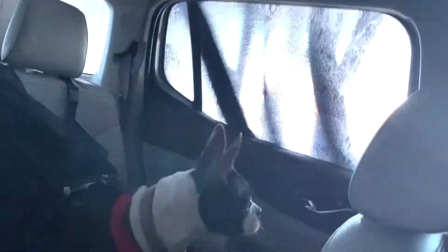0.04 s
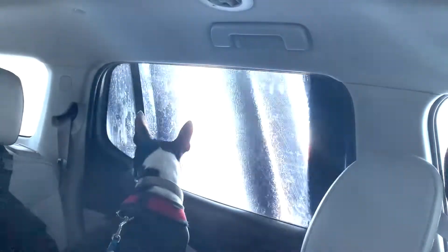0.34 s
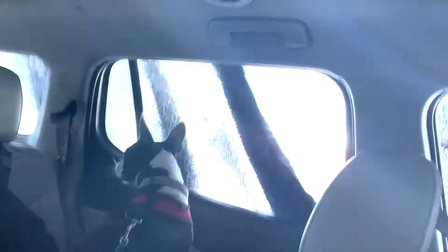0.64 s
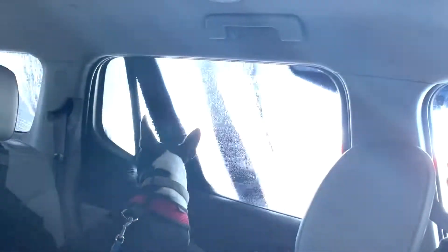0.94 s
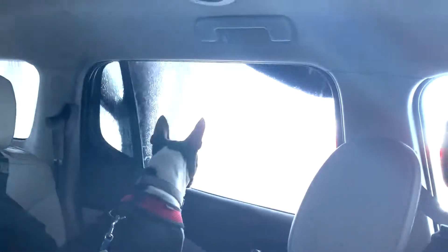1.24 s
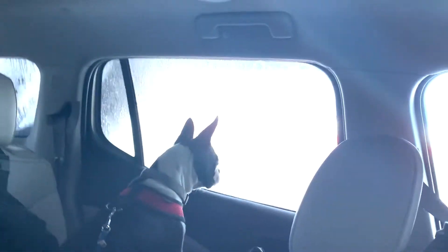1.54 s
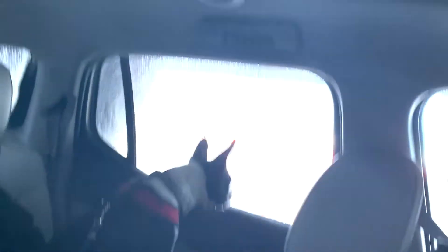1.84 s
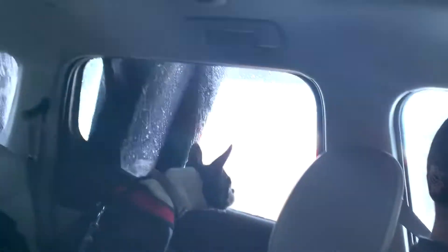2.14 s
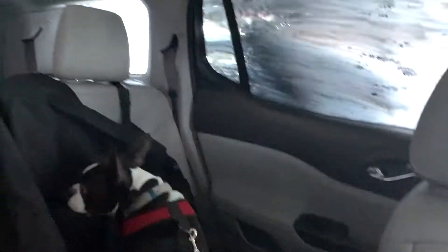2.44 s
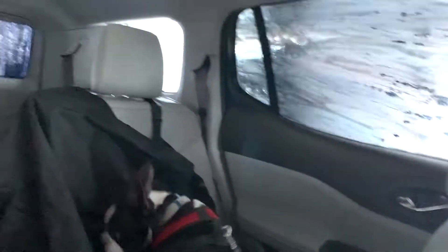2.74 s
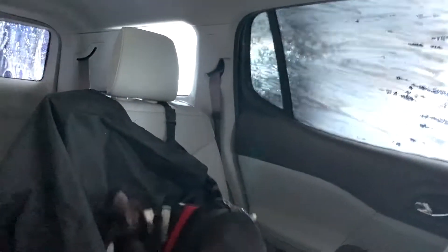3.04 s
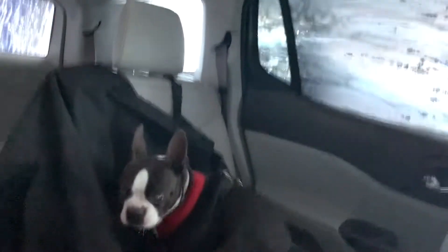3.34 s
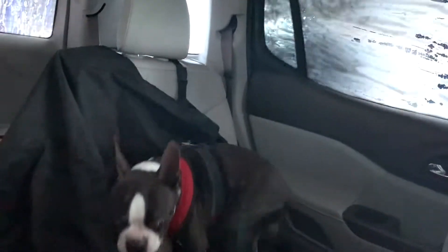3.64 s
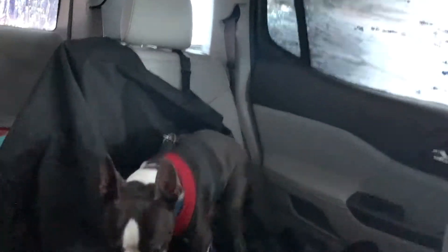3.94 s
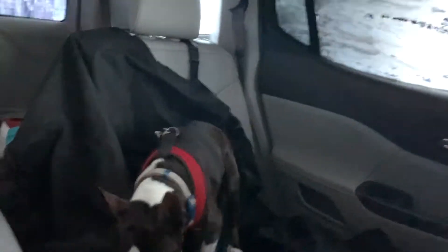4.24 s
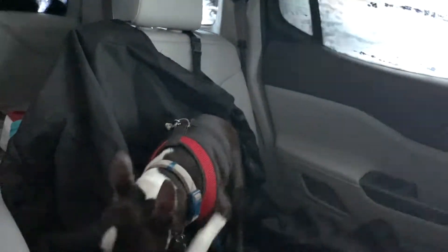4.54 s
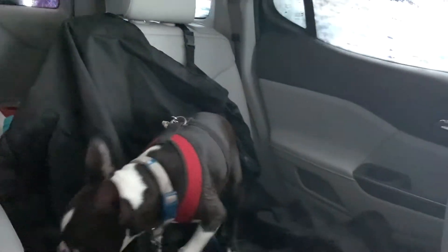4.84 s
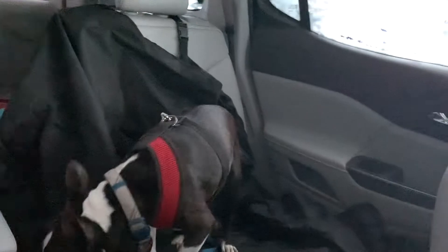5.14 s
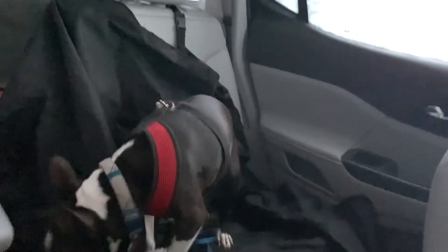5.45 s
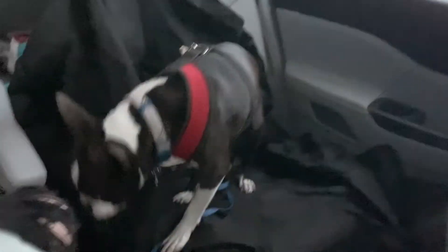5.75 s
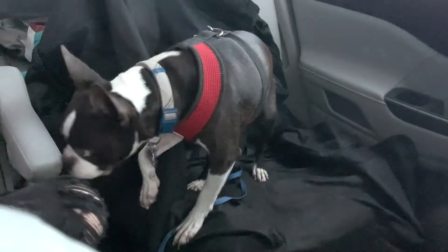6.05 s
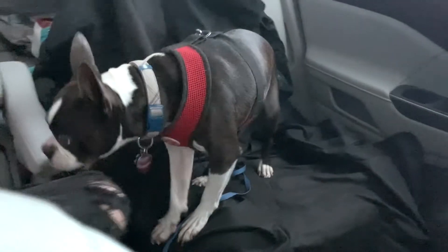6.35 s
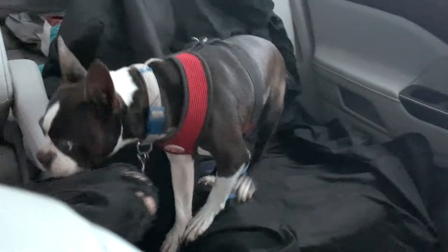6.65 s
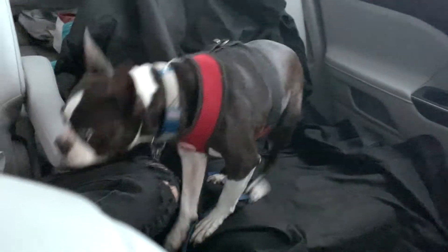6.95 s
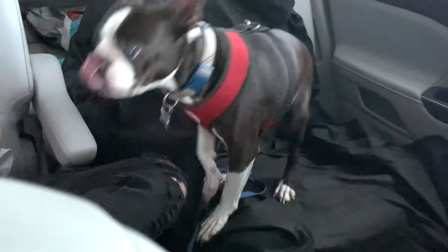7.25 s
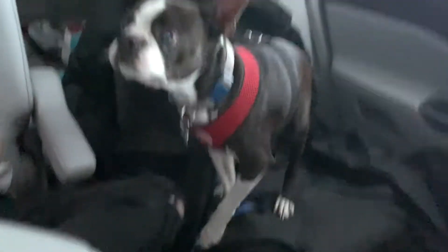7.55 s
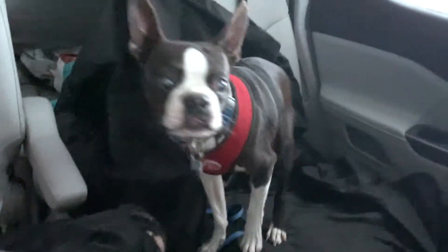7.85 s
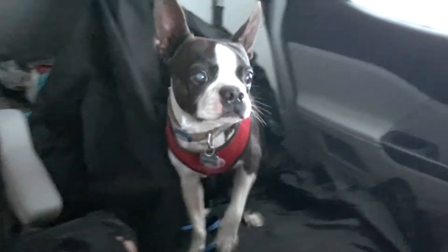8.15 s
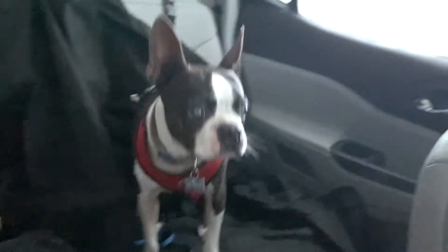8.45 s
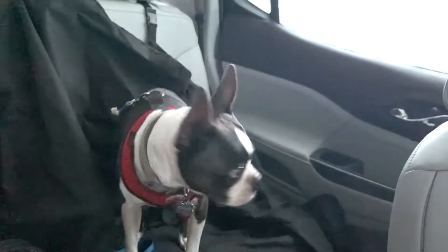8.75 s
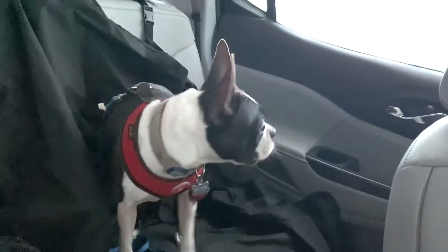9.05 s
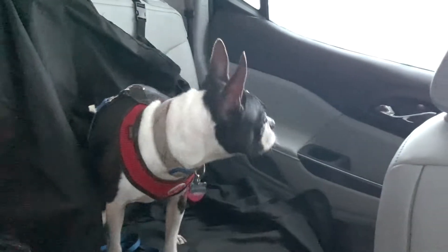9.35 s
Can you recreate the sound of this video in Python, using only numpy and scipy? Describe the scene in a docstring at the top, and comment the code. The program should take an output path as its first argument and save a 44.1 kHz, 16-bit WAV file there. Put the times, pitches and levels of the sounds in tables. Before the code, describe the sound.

Heard from inside a car in an automatic wash, spinning brushes slap the body in a fast rhythm, booming and drumming on the wet panels over a deep rumble. Spray hisses on the glass for the first two seconds, then drops back. From about three seconds a dog's collar tags clink now and then, with faint rustling on the seat cover. Hollow raps join near the end.

```python
"""Car wash with a dog aboard

Heard from inside the car, turning brushes slap the body with cloth strips twice a turn and drag them
over it in between. Each slap booms in the cabin, drums the wet panels and splashes; spray patters on
the glass. On the back seat a dog shifts on the seat cover and its metal collar tags clink."""
import sys
import numpy as np
from scipy import signal
from scipy.fft import rfft, irfft
from scipy.io import wavfile
from scipy.ndimage import uniform_filter1d

SR = 44100
rng = np.random.default_rng(int(sys.argv[2]) if len(sys.argv) > 2 else 0)


def dump_mix(stems):
    """Bounce the given channels to the path in sys.argv[1] as a 16-bit WAV at rate SR."""
    frames = np.atleast_2d(stems).T  # one column per channel
    limited = np.clip(frames, -1, 1)  # hard clip at full scale
    pcm = np.round(limited * 32767).astype(np.int16)
    wavfile.write(sys.argv[1], SR, pcm)


N = 414981
T = np.arange(N) / SR
EAR_LAG_S = 10 / SR

# Table levels are relative: each layer has its own gain on top.
# Stereo width of sound through the body. Each row: frequency in Hz, side against mid in dB.
BODY_WIDTH = [(40, -21), (80, -14), (130, -13.5), (260, -13), (500, -5.5), (800, -1), (1400, 1),
              (3000, 1.5)]
# Spray on the glass. Each row: time in seconds, level in dB.
SPRAY_LEVELS = [(0, -38.5), (.37, -37.5), (.6, -41), (.88, -40), (1.1, -36.5), (1.9, -36.5), (2.05, -40),
                (2.31, -43.5), (2.35, -50.5), (4.35, -47.5), (4.55, -53), (5.2, -50.5), (5.95, -53.5),
                (6.6, -51), (9.41, -50)]
# Wipes of wet cloth, and the dog's moves. Each row: centre and length in seconds, level in dB.
CLOTH_WIPES = [(.05, 0.056, -38.5), (1.966, 0.024, -36.5), (2.268, .016, -35), (4.083, 0.028, -39),
               (4.295, 0.044, -39), (8.857, 0.018, -37), (9.06, 0.03, -36), (9.11, .08, -37.5),
               (9.157, 0.028, -37)]
DOG_MOVES = [(3.3, 0.22, -53), (4.17, 0.11, -50), (5.33, 0.18, -53), (6.27, 0.11, -48.5),
             (6.45, 0.13, -47.5), (7.07, 0.11, -53), (7.33, 0.14, -52.5), (8.3, 0.6, -55.5),
             (9.1, 0.19, -49)]
# Tone of the noisy layers. Each row: frequency in Hz, level in dB.
SPRAY_TONE = [(1200, -16), (2500, -8), (4000, -4), (6000, 2.5), (8500, 1.5), (11000, 4.5), (14000, -3),
              (16000, 0)]
WIPE_TONE = [(600, -23), (1500, 15), (2000, 13.5), (2400, 17.5), (2750, 13), (3200, 11), (4200, 6.5),
             (6500, -1.5), (10000, -12), (16000, -32)]
THROB_TONE = [(18, -27.5), (33, -10), (43, 4), (55, -3.5), (68, -21)]
RUMBLE_TONE = [(15, -49), (28, -11), (44, -11), (58, -2), (78, 5), (98, -3), (120, -0.5), (145, -9.5),
               (220, -36)]
PANEL_TONE = [(90, -28.5), (135, -2), (185, 2), (240, -2.5), (300, -5.5), (350, -3.5), (440, -9.5),
              (550, -11.5), (660, -23.5), (900, -35), (1600, -54)]
SPLASH_TONE = [(400, -7), (680, 5), (920, -1.5), (1200, -3.5), (1420, -8.5), (1650, -8.5), (1900, -12),
               (2200, -11.5), (3000, -18), (3800, -18.5), (5500, -29.5), (9000, -58)]
# Collar tags meet. Each row: start in seconds, then contact tick, main mode and upper modes in dB.
TAG_CLINKS = [(3.053, -38, -37, -52), (3.21, -29, -29, -42), (3.414, -35, -22, -44), (3.51, -37, -39, -48),
              (3.628, -37, -26, -45), (3.715, -42, -31, -43), (3.835, -36, -48, -44),
              (3.976, -37, -35, -46), (4.149, -28, -22, -38), (4.188, -28, -38, -47),
              (4.237, -32, -27, -43), (4.354, -34, -33, -48), (4.393, -40, -34, -49),
              (4.728, -40, -39, -53), (5.528, -35, -28, -44), (5.669, -36, -30, -41),
              (6.054, -30, -17, -31), (6.275, -36, -29, -41), (6.291, -28, -26, -45),
              (6.548, -41, -42, -44), (7.537, -43, -36, -55), (7.658, -43, -35, -54),
              (8.075, -42, -33, -50), (8.264, -42, -37, -47), (8.404, -32, -24, -45),
              (8.442, -42, -31, -49), (9.075, -39, -30, -51), (9.209, -41, -32, -53)]
# Modes of a tag (main one first), the collar's metal ring and a small stiff part like plastic trim.
# Each row: frequency in Hz, level in dB, nominal time to fade by 60 dB in seconds.
TAG_MODES = [(8628, 1, .16), (13019, 0, .18), (13890, -8, .08), (14423, -12, .08), (15540, -12, .06)]
COLLAR_MODES = [(5566, -6.5, .26), (5990, 2, .03)]
TRIM_MODES = [(1626, -3, .035), (1965, 0, .05), (2266, -4, .065), (3397, -4, .04)]
# Deepest throb of the body. Each row: time in seconds, level in dB.
THROB_LEVELS = [(0, -16.5), (.35, -17), (.55, -18), (.8, -24), (1, -20), (1.5, -23), (2.15, -17),
                (2.28, -22), (2.36, -28), (5.6, -34), (6.4, -16), (7.7, -28.5), (8.2, -24), (9.41, -24)]
# Cloth dragging between slaps. Each row: time in seconds, then rumble, drumming and splash in dB.
DRAG_LEVELS = [(0, -21, -21.5, -31), (0.7, -19.5, -22.5, -34), (2.1, -19, -21.5, -31.5),
               (2.4, -17.5, -19.5, -30.5), (2.9, -22, -20.5, -30), (3.4, -16.5, -20.5, -29.5),
               (4.1, -18.5, -19.5, -29), (4.55, -19, -19, -31.5), (5, -18, -18.5, -30),
               (5.95, -19.5, -17, -31), (6.5, -21, -18.5, -32), (7.2, -18.5, -20, -31.5),
               (7.75, -19, -19, -32), (8.2, -20.5, -18, -28.5), (8.5, -19, -15.5, -28),
               (9.41, -19.5, -16.5, -29)]
# Panels ringing under a brush. Each row: start and end in seconds, pitch and filter width in Hz,
# level in dB.
PANEL_RINGS = [(0.065, 2.25, 259, 104, -28.5), (2.35, 4.26, 373, 105, -27.5), (4.84, 6.73, 189, 21, -29),
               (4.8, 7.3, 541, 99, -34.5), (4.52, 6.1, 860, 450, -39.5), (5.41, 6.08, 352, 180, -25),
               (5.97, 6.58, 182, 14, -25), (6.3, 7.87, 78, 15, -17), (8, 8.85, 695, 130, -37),
               (8.8, 9.6, 830, 190, -38)]
# Soaked strips smack flat on doors and glass; the last brush raps on a stiff, hollow panel.
# Each row: time in seconds, pitch of the spot in Hz, level in dB.
WET_SMACKS = [(1.815, 740, -32), (1.979, 690, -31), (2.33, 716, -22.5), (2.385, 1010, -29.5),
              (2.521, 700, -27), (2.586, 537, -23.5), (2.69, 555, -30), (3.217, 525, -21), (3.33, 750, -28),
              (3.572, 814, -26.5), (4.083, 540, -21), (4.279, 540, -21.5), (4.382, 563, -25),
              (4.794, 550, -23), (4.884, 806, -25.5), (5.19, 596, -27), (5.694, 604, -25),
              (5.809, 540, -25), (5.961, 596, -23), (6.14, 557, -25), (6.761, 516, -22.5),
              (7.998, 560, -20), (8.152, 507, -18.5), (8.383, 558, -18), (8.496, 564, -21),
              (8.56, 505, -17)]
HOLLOW_RAPS = [(8.208, 850, -27), (8.324, 935, -30.5), (8.424, 860, -29.5), (8.51, 850, -27),
               (8.597, 896, -29), (8.657, 860, -27.5), (8.735, 925, -28.5), (8.815, 880, -26.5),
               (8.95, 900, -24.5), (9.185, 904, -26), (9.254, 925, -27), (9.299, 900, -26),
               (9.374, 890, -27.5)]
# Tone of a smack and of a rap. Each row: multiple of the pitch, level in dB.
SMACK_TONE = [(.3, -12.5), (.75, -8), (1, 7.5), (1.25, -8.5), (1.6, -7), (2, -21.5), (2.4, -18.5),
              (5, -35.5)]
RAP_TONE = [(.6, -34), (.85, -16), (.95, -1), (1.07, 0), (1.16, -19), (1.36, -16), (1.6, -30)]
# Hard blows that each sound one panel. Each row: time in seconds, pitch in Hz, level in dB.
PANEL_KNOCKS = [(2.335, 190, -8.5), (2.597, 413, -19), (2.773, 347, -9.5), (2.97, 354, -8.5),
                (3.376, 185, -13), (4.294, 408, -15), (4.38, 187, -10), (4.877, 444, -16),
                (5.172, 178, -13), (5.232, 188, -12), (5.329, 198, -13), (5.531, 348, -15),
                (5.928, 218, -11), (5.958, 366, -12), (6.029, 193, -13), (6.141, 190, -9), (6.28, 210, -11),
                (6.418, 194, -12), (6.957, 186, -12), (7.129, 182, -10), (7.239, 188, -6),
                (7.315, 175, -11), (7.497, 130, -11), (8.56, 470, -12), (9.185, 355, -13)]
# Brushes take over in turn. Each row: first slap in seconds, turns per second, boom pitch in Hz.
BRUSH_PASSES = [(0.104, 3.9, 60.3), (2.381, 5, 90), (4.601, 4.93, 80), (6.39, 6.1, 84), (8.01, 5.03, 85.4)]
# The heavy slaps. Each row: time in seconds, boom pitch in Hz, then boom and drumming in dB.
ACCENT_SLAPS = [(0.427, 75.5, -6.5, -21.5), (.52, 69, -15, -25), (.615, 56.6, -10, -22),
                (.666, 61, -12, -32), (0.799, 57.4, -9, -27), (0.851, 70.5, -7.5, -41),
                (1.066, 77.5, -9, -30), (1.189, 72, -9, -36), (1.432, 78, -5, -28), (1.529, 43.2, -7, -28),
                (1.622, 71, -5.5, -19), (1.675, 64.4, -6, -26), (1.846, 77, -12, -19),
                (1.972, 68.5, -8, -25), (2.148, 62, -3.5, -36), (2.257, 71, -10, -39),
                (2.377, 91, -12, -16), (2.523, 84, -4.5, -23), (2.698, 93, -4.5, -17),
                (2.78, 86, -4.5, -22), (2.946, 83.4, -7, -13.5), (3.879, 94, -6.5, -21),
                (4.087, 82, -6, -31), (4.285, 103.6, -3, -14), (5.392, 87, -6.5, -34),
                (5.817, 90, -7, -19.5), (6.023, 85, -6, -18.5), (6.138, 79, -11, -14.5),
                (6.22, 84, -4.5, -28), (6.406, 89, -1, -19), (6.547, 101, -5, -20), (6.595, 90, -7, -26),
                (6.684, 84, -3, -26), (6.821, 98, -9, -20.5), (6.891, 92.5, -4.5, -22),
                (6.966, 88, -7, -25), (7.012, 79.5, -7.5, -22), (7.108, 75, -5.5, -19),
                (7.168, 83.5, -3.5, -21), (7.245, 84, -5, -20), (7.295, 103, -6, -23),
                (7.377, 81, -4.5, -25), (7.5, 101.7, -2.5, -29), (7.683, 47.6, -10, -16.5),
                (7.748, 93, -13, -18.5), (8.56, 83, -6, -12.5), (8.66, 97, -9, -18)]


def undb(db):
    """Decibels to gain."""
    return 10 ** (np.asarray(db) / 20)


def curves(table):
    """Each level column of a timed table as a fader ride."""
    times, *columns = np.transpose(table)
    return [np.interp(T, times, column) for column in columns]


def impulse(points, size=8192):
    """Minimum-phase impulse response through (Hz, dB) points, rolling off above the last."""
    hz, db = np.transpose(points)
    grid = np.maximum(np.arange(size // 2 + 1) * SR / size, 1)
    gain = undb(np.interp(np.log(grid), np.log(hz), db)) * np.minimum(hz[-1] / grid, 1) ** 2
    cepstrum = irfft(np.log(gain))
    cepstrum[1:size // 2] *= 2
    cepstrum[size // 2 + 1:] = 0
    return irfft(np.exp(rfft(cepstrum)))


def colour(x, tone):
    """Give a white excitation a tone, keeping its power."""
    ring = impulse(tone)
    return signal.oaconvolve(x, ring[None] / np.linalg.norm(ring), axes=1)[:, :N]


def flutter(rate):
    """Glide to a new random value rate times a second."""
    hold = int(SR / rate)
    return uniform_filter1d(rng.standard_normal(N)[np.arange(N) // hold], hold)


def impacts(rate, spread_db=0):
    """Two unrelated streams of tiny random impacts, rms 1; spread_db makes them more uneven."""
    sizes = undb(spread_db * rng.standard_normal((2, N)))
    hits = (rng.random((2, N)) < rate / SR) * rng.standard_normal((2, N)) * sizes
    return hits / hits.std()


def add(track, start_s, sound):
    """Mix a sound into a track at a time."""
    start = int(start_s * SR)
    first, last = max(start, 0), min(start + len(sound), N)
    if last > first:
        track[first:last] += sound[first - start:last - start]


def strokes(rows, gain_db):
    """Envelope of strokes that swell and fade."""
    return sum(undb(db + gain_db) * np.exp(-2 * ((T - s) / length) ** 2) for s, length, db in rows)


def landing(t, rise, fall):
    """Envelope of a strip that lays itself on the body, peaks at t = 0 and slides off."""
    return np.where(t < 0, np.exp(-(t / rise) ** 2), np.exp(1 - np.hypot(1, t / fall)))


def surround(pair, left_db):
    """Mid and side to stereo: bass fills the cabin alike, higher sounds come from all round."""
    side = signal.oaconvolve(pair[1], impulse(BODY_WIDTH))[:N]
    return np.array([pair[0] + side, pair[0] - side]) * undb([[left_db / 2], [-left_db / 2]])


def from_right(x):
    """A sound from the right: the left side hears it a little later, with its sign flipped."""
    return np.array([-np.interp(T - EAR_LAG_S, T, x), x])


def cabin(pair, echo_db, t60):
    """Glass and trim return a sound within milliseconds, differently to each side."""
    t = np.arange(SR // 12) / SR
    echoes = rng.standard_normal((2, len(t))) * 1000 ** (-t / t60) * (t > .002)
    echoes *= undb(echo_db) / np.linalg.norm(echoes, axis=1, keepdims=True)
    return (pair + signal.oaconvolve(pair, echoes, axes=1)[:, :N]) / np.hypot(1, undb(echo_db))


def spray(gain_db, diffuse_db):
    """Fine drops patter on the side window; the lower hiss scatters round the cabin."""
    strength = undb(curves(SPRAY_LEVELS)[0] + gain_db + flutter(27))
    direct = from_right(colour(impacts(22000) * strength, SPRAY_TONE)[0])
    diffuse_tone = [(1000, -1.5), (2300, 1), (4000, -1.5), (6000, -5.5), (8000, -24.5)]
    diffuse = colour(impacts(12000, spread_db=.5) * strength, diffuse_tone)
    return direct + undb(diffuse_db) * diffuse


def swishes(gain_db):
    """Short, bright wipes of cloth that grips and slips on the glass."""
    grip = undb(3 * flutter(120))
    return colour(impacts(2500, spread_db=2.5) * grip * strokes(CLOTH_WIPES, gain_db), WIPE_TONE)


def rustle(gain_db, diffuse_db):
    """Fur and harness catch on the weave of the seat cover; the cabin scatters the lower hiss."""
    strength = strokes(DOG_MOVES, gain_db) * undb(2.2 * flutter(45))
    catches = impacts(16000, spread_db=2.2) * strength
    direct = from_right(colour(catches, [(2500, -5), (6000, -36), (9000, 24), (16000, 5)])[0])
    diffuse_tone = [(2500, -8), (5500, .5), (7000, 6.5), (9000, -30)]
    diffuse = colour(rng.standard_normal((2, N)) * strength, diffuse_tone)
    return direct + undb(diffuse_db) * diffuse


def collar_tags(tick_gain_db, tick_decay_s, rebound_db):
    """Tags tick together, rebound once and ring, in a new mix for each point of contact."""
    contacts, left, right = np.zeros((3, N))
    t = np.arange(SR // 3) / SR
    hz, mode_db, t60 = np.transpose(TAG_MODES)[:, :, None]
    for s, tick_db, main_db, upper_db in TAG_CLINKS:
        detune, damping, swing = rng.standard_normal((3, len(TAG_MODES), 1))
        pitch = hz * (1 + .0008 * detune)
        ring_s = t60 * np.exp(.2 * damping)  # fur damps each ring differently
        lag_s = 229e-6 + 2e-6 * swing  # swinging shifts the lag between the ears
        fade = undb(np.where(hz == hz[0], main_db, upper_db) + mode_db) * 1000 ** (-t / ring_s)
        add(right, s, (fade * np.sin(2 * np.pi * pitch * t)).sum(0))
        add(left, s + EAR_LAG_S, -(fade * np.sin(2 * np.pi * pitch * (t + EAR_LAG_S - lag_s))).sum(0))
        for delay_s, db in [(0, 0), (rng.uniform(.002, .009), rebound_db)]:
            tick = np.exp(-t / tick_decay_s) * rng.standard_normal(len(t))
            add(contacts, s + delay_s, undb(tick_db + tick_gain_db + db) * tick)
    tick_tone = [(2000, -22), (6000, -20), (8700, 7), (11000, 7.5), (14200, 13), (16000, -2)]
    return np.array([left, right]) + from_right(colour(contacts[None], tick_tone)[0])


def struck(modes, start_s, level_db):
    """One blow on a small object: its modes ring and fade."""
    out, t = np.zeros(N), np.arange(SR // 3) / SR
    for hz, db, t60 in modes:
        add(out, start_s, undb(level_db + db) * np.sin(2 * np.pi * hz * t) * 1000 ** (-t / t60))
    return out


def dry_tick(start_s, level_db, decay_s):
    """A dry tick that starts at once and dies within milliseconds."""
    envelope, t = np.zeros(N), np.arange(SR // 20) / SR
    add(envelope, start_s, undb(level_db) * np.exp(-t / decay_s))
    tone = [(800, -6), (2200, 3), (8000, -3), (16000, -8)]
    return colour(envelope * rng.standard_normal((2, N)), tone)


def throb():
    """The whole body of the car heaves under the brushes."""
    heave = rng.standard_normal((2, N)) * undb(curves(THROB_LEVELS)[0])
    return surround(colour(heave, THROB_TONE), left_db=-1.5)


def smacks(rows, tone, gain_db, rise_s, fall_s):
    """A wet strip lands all at once: a burst of noise, coloured by the spot it hits."""
    out, t = np.zeros((2, N)), np.arange(-SR // 30, SR // 8) / SR
    shape = landing(t, rise_s, fall_s)
    for s, hz, db in rows:
        spot_tone = [(hz * multiple, level) for multiple, level in tone]
        bursts = colour(rng.standard_normal((2, len(t))) * shape, spot_tone)
        for track, burst in zip(out, bursts):
            gain = undb(db + gain_db) * np.linalg.norm(shape) / np.linalg.norm(burst)
            add(track, s + t[0], gain * burst)
    return out


def panel_rings(force):
    """Panels ring at their own pitch, pulsing with the force of the strips."""
    out = 0
    for start, end, hz, width, db in PANEL_RINGS:
        contact = np.clip(np.minimum(T - start, end - T) / .2 + .5, 0, 1)
        b, a = signal.iirpeak(hz, hz / width, fs=SR)
        drive = rng.standard_normal((2, N)) * force * contact
        ring = signal.lfilter(b, a, signal.lfilter(b, a, drive))
        out += undb(db) * ring * np.sqrt(np.mean(contact ** 2)) / ring.std()
    return out


def slap_pattern(weak_strip_db, jitter_s, pitch_scatter, scatter_db, clear_s):
    """Two strips land unevenly each turn, the second weaker, keeping clear of the heavy slaps."""
    drag_s, *drag_db = np.transpose(DRAG_LEVELS)
    over_drag_db = np.array([6, -2.5, -7])  # boom, drumming, splash

    def usual_db(s):
        """A slap is as hard as the brush presses."""
        return over_drag_db + [np.interp(s, drag_s, db) for db in drag_db]

    # Each row: time in seconds, pitch in Hz, then boom, drumming and splash in dB.
    rows = [(*row, usual_db(row[0])[2]) for row in ACCENT_SLAPS]
    heavy_s = np.array(ACCENT_SLAPS)[:, 0]
    ends = [row[0] - clear_s for row in BRUSH_PASSES[1:]] + [T[-1]]
    for (start, turns, hz), end in zip(BRUSH_PASSES, ends):
        for strip, chance in enumerate(rng.standard_normal((32, 5))):
            s = start + strip / (2 * turns) + jitter_s * chance[0]
            if s < end and np.abs(heavy_s - s).min() > clear_s:
                levels_db = usual_db(s) + weak_strip_db * (strip % 2) + scatter_db * np.tanh(chance[2:])
                rows.append((s, hz * np.exp(pitch_scatter * chance[1]), *levels_db))
    return np.array(rows)


def slap_force(times, levels_db, rise_s, fall_s):
    """Envelope of the flurries of impacts that the slaps bring, summed in power."""
    power, t = np.zeros(N), np.arange(-SR // 10, SR // 5) / SR
    shape = landing(t, rise_s, fall_s)
    for s, db in zip(times, levels_db):
        add(power, s + t[0], (undb(db) * shape) ** 2)
    return np.sqrt(power)


def brushes(slaps):
    """Cloth drags and slaps: the body rumbles, the panels drum and the water film splashes."""
    rumble_db, drag_drum_db, drag_splash_db = curves(DRAG_LEVELS)
    times, _, _, drum_db, splash_db = slaps.T
    rumble = colour(rng.standard_normal((2, N)) * undb(rumble_db + 3), RUMBLE_TONE)
    flapping = undb(drag_drum_db - .62 + 1.3 * flutter(35))  # lesser strips between the big slaps
    wash = undb(drag_splash_db - 4.5 + 1.3 * flutter(30))
    drum = np.hypot(flapping, slap_force(times, drum_db - 1, rise_s=.035, fall_s=.016))
    splash = np.hypot(wash, slap_force(times, splash_db, rise_s=.012, fall_s=.012))
    panels = colour(impacts(3500, spread_db=1.5) * drum, PANEL_TONE) + panel_rings(drum * splash)
    water = colour(impacts(12000) * splash, SPLASH_TONE)
    water = cabin(surround(water, left_db=1.1), echo_db=-7, t60=.05)
    return surround(rumble, left_db=.5) + surround(panels, left_db=1.2) + water


def panel_booms(rows, gain_db, rise_cycles, fall_cycles):
    """Each blow pushes a whole panel, which swings with the cabin air for a few cycles."""
    out, t = np.zeros(N), np.arange(-SR // 10, SR // 5) / SR
    for (s, hz, db, *_), phase in zip(rows, rng.random(len(rows))):
        shape = landing(t, rise_cycles / hz, fall_cycles / hz)
        swing = np.sqrt(2) * np.sin(2 * np.pi * (hz * t + phase))
        add(out, s + t[0], undb(db + gain_db) * shape * swing)
    return out


def scene():
    """The mix: brushes and water outside, the dog inside."""
    slaps = slap_pattern(weak_strip_db=-1.7, jitter_s=.009, pitch_scatter=.07, scatter_db=3, clear_s=.055)
    wet_strips = smacks(WET_SMACKS, SMACK_TONE, gain_db=0, rise_s=.003, fall_s=.007)
    cloth = brushes(slaps) + throb() + surround(wet_strips, left_db=2.5)
    glass = spray(gain_db=-6, diffuse_db=1.5) + swishes(gain_db=.5)
    dog = collar_tags(tick_gain_db=.5, tick_decay_s=.003, rebound_db=-8)
    dog += from_right(struck(COLLAR_MODES, start_s=6.056, level_db=-39))  # hit by the loudest-ringing clink
    dog += rustle(gain_db=-.5, diffuse_db=-.5)
    booms = panel_booms(slaps, gain_db=-5, rise_cycles=2, fall_cycles=1.27)
    knocks = panel_booms(PANEL_KNOCKS, gain_db=-2.5, rise_cycles=2.3, fall_cycles=1.8)
    raps = smacks(HOLLOW_RAPS, RAP_TONE, gain_db=-1, rise_s=.011, fall_s=.011)
    tick = dry_tick(start_s=2.3257, level_db=-27, decay_s=.0008)
    trim = struck(TRIM_MODES, start_s=8.119, level_db=-28)
    return glass + dog + tick + trim + cloth + surround(raps, left_db=3.5) + knocks + booms


def record(dry):
    """Round off the highest peaks and cut the treble above 15.9 kHz."""
    rounded = dry / (1 + dry ** 8) ** (1 / 8)
    return signal.sosfilt(signal.ellip(10, .1, 80, 15900, fs=SR, output="sos"), rounded)


dry = scene()
out = record(dry)
dump_mix(out)
```